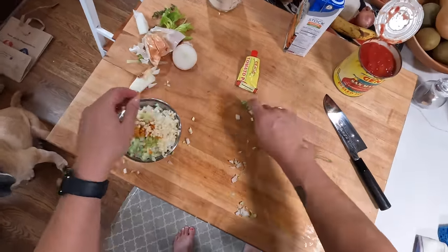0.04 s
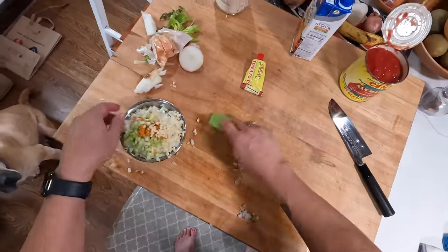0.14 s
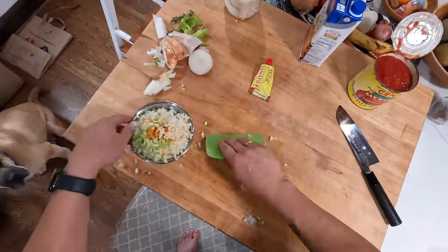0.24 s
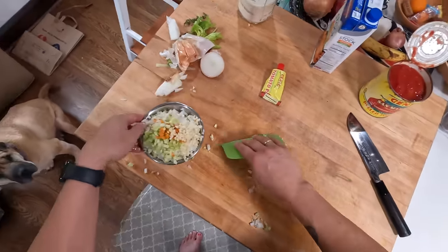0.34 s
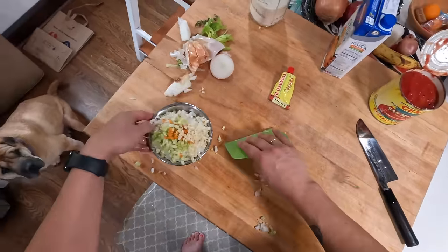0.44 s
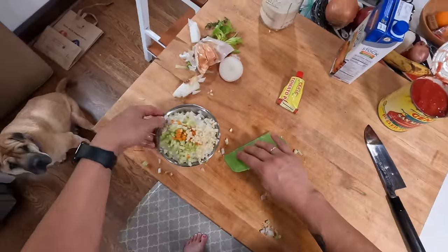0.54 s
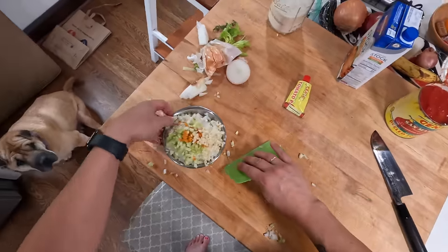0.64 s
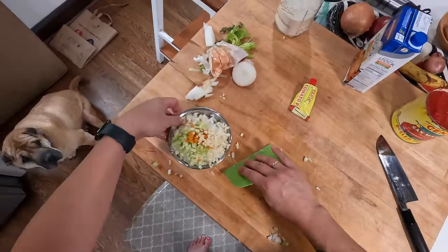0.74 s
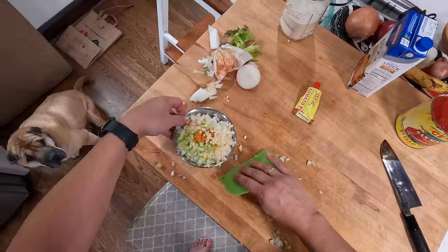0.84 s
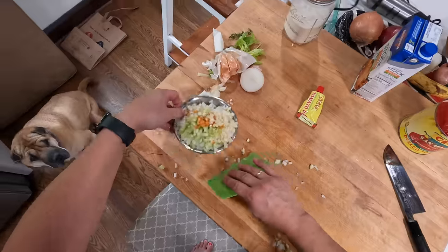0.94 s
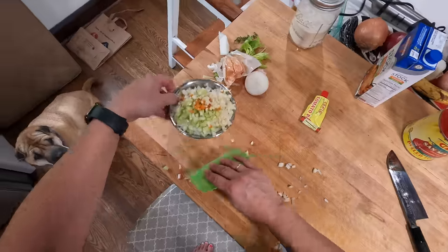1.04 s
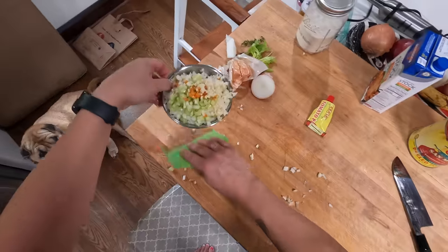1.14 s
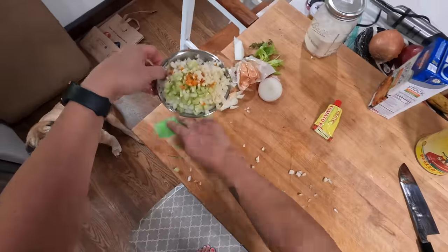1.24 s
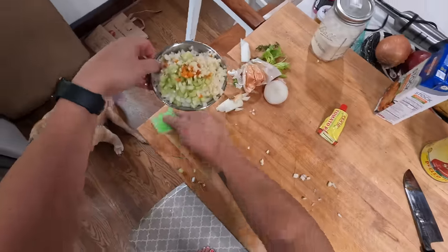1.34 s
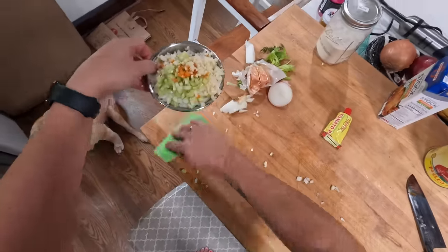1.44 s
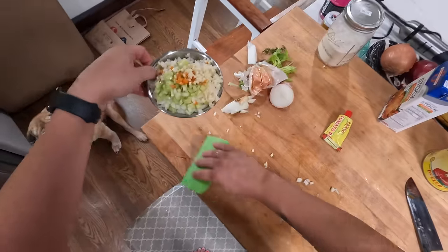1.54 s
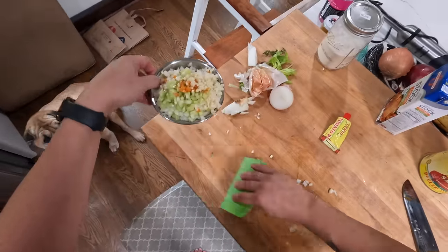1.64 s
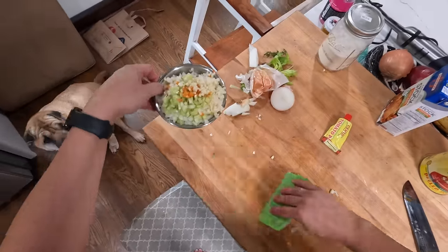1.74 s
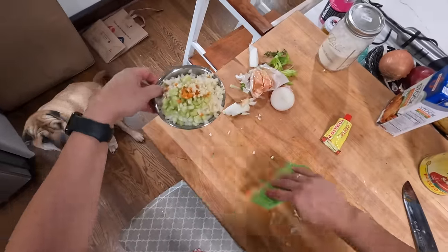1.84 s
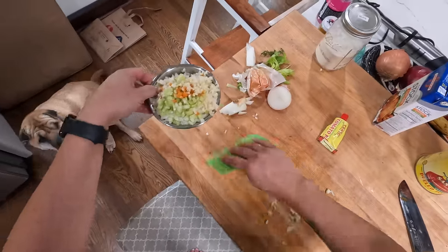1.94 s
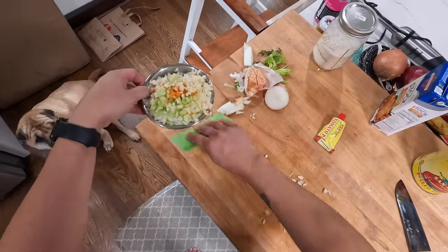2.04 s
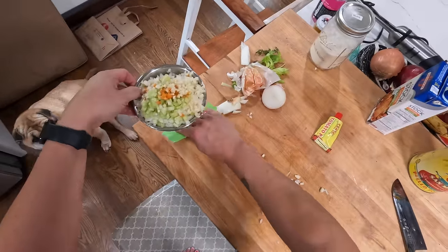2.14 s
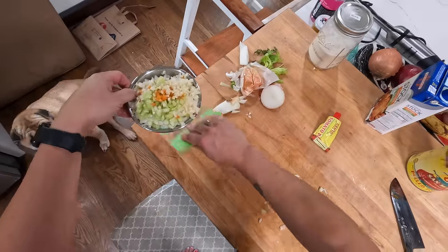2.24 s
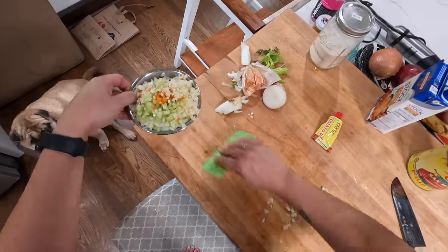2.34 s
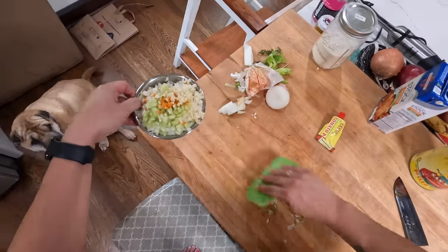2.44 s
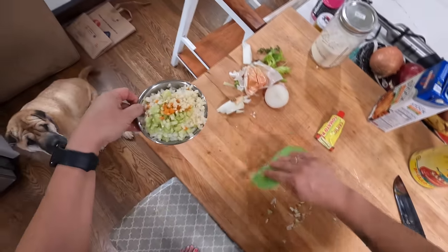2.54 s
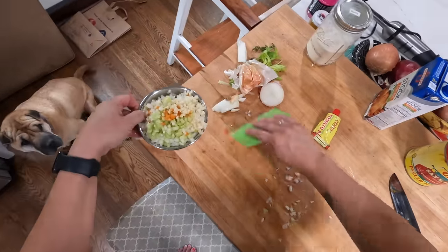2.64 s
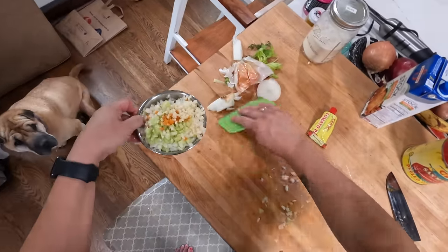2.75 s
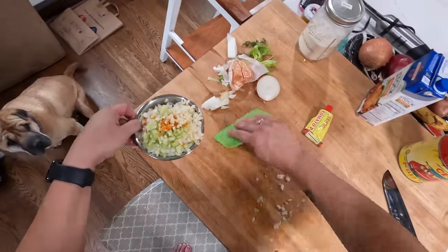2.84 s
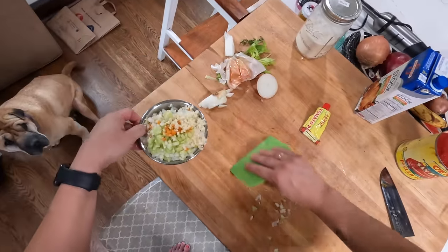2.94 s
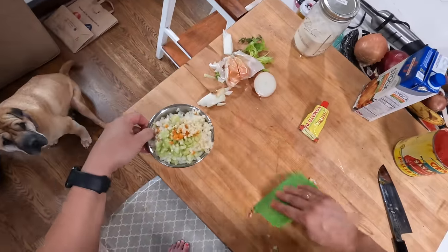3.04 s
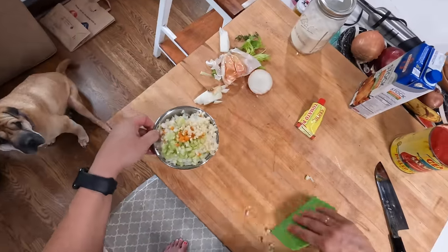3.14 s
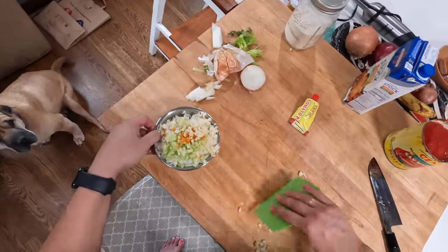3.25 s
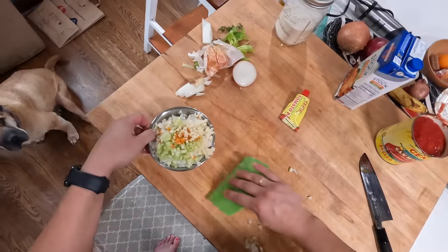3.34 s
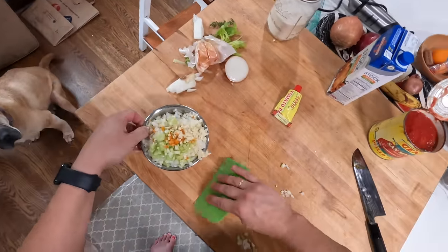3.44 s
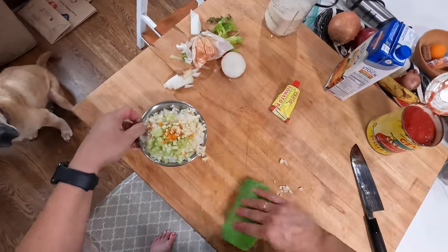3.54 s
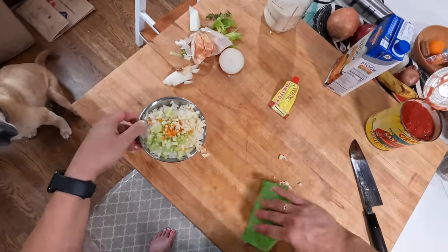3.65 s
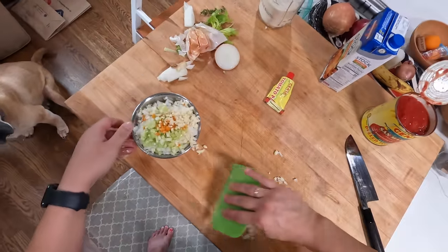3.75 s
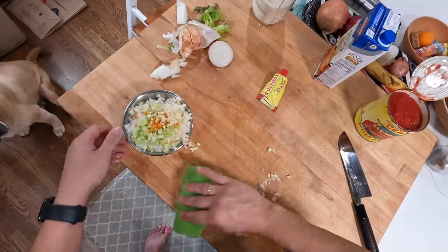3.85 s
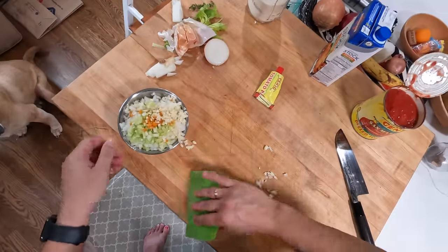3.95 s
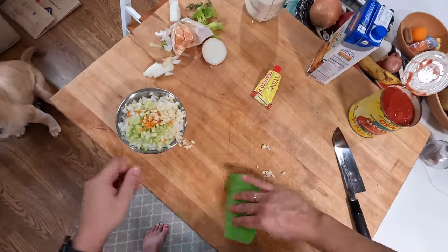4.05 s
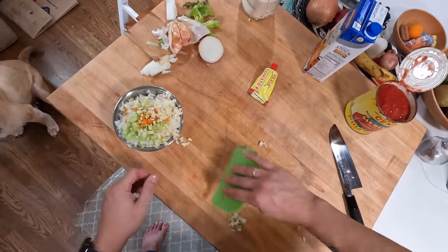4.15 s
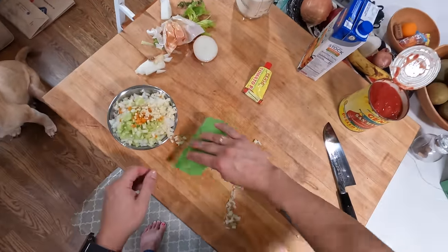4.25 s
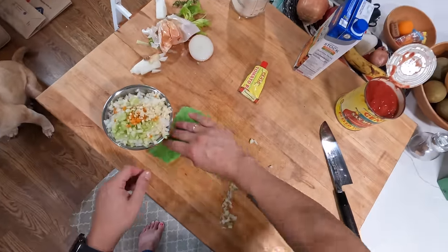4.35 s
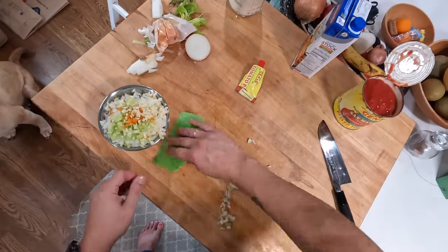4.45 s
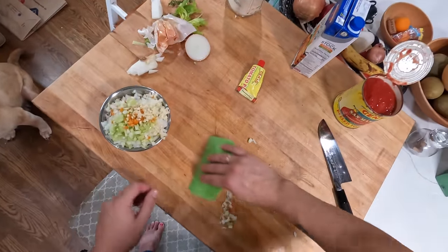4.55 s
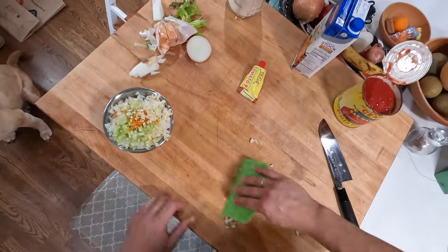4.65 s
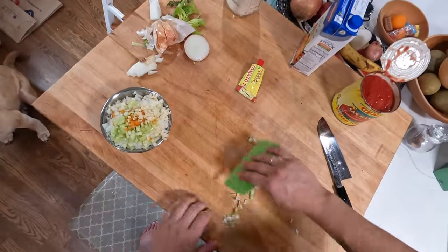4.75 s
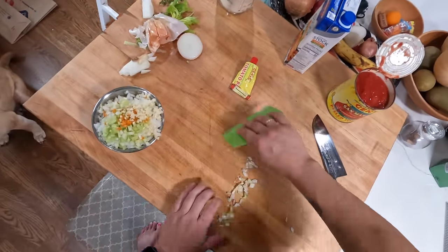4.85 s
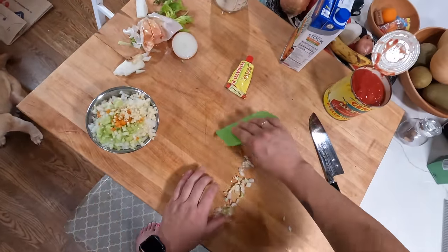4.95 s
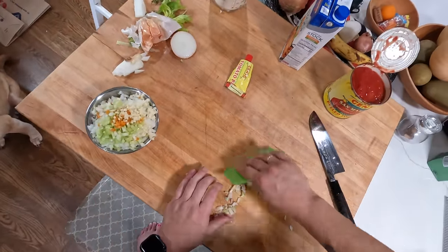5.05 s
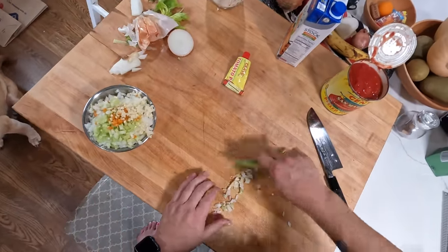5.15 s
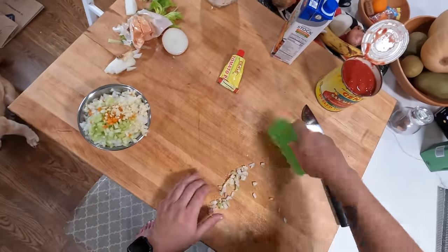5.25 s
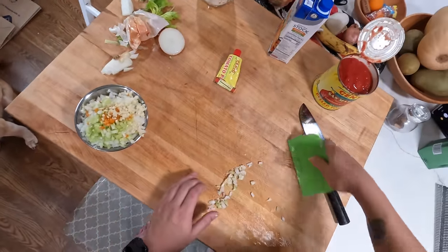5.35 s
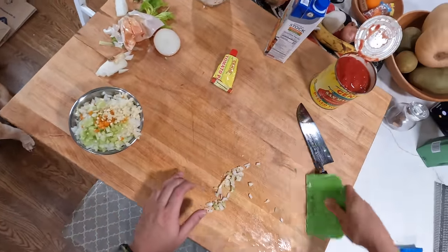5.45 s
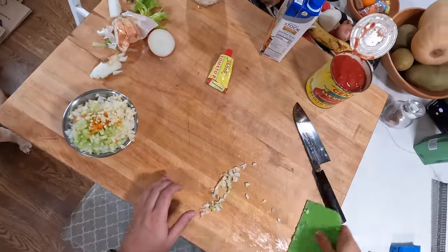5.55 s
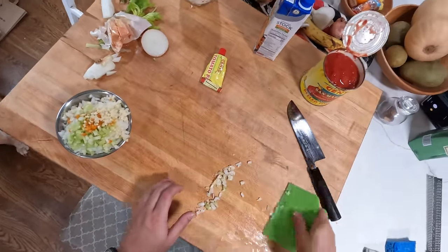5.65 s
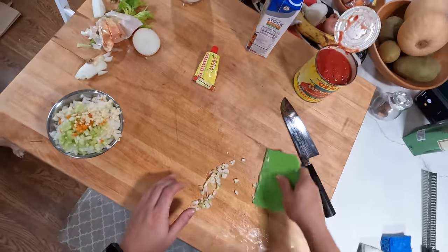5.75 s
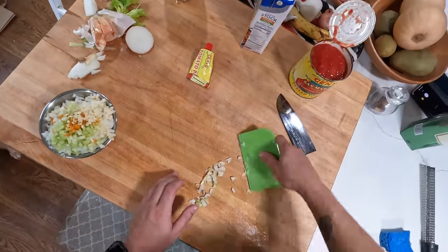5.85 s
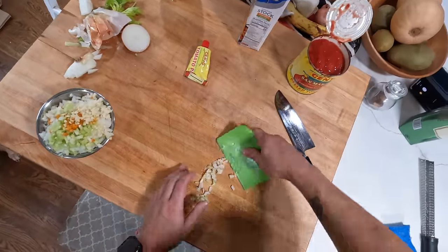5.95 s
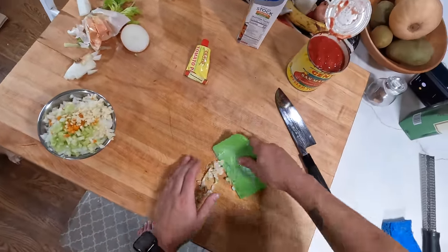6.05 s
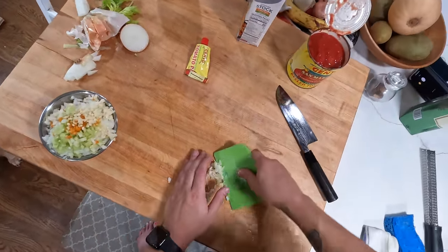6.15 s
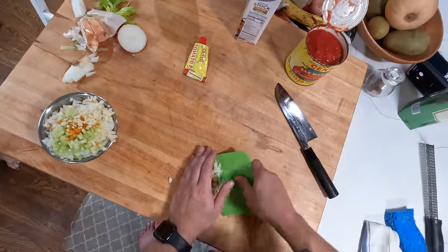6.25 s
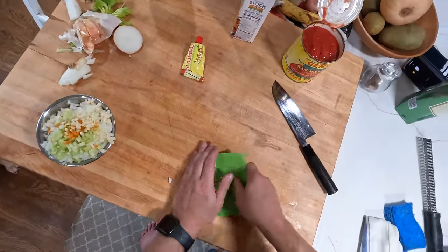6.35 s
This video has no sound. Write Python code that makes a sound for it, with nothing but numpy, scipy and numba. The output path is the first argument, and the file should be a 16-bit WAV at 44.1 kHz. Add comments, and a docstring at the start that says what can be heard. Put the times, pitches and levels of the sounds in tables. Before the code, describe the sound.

Close, dry scraping of a plastic blade on wood, sharp clacks between strokes, a bowl-like knock midway, then softer hollow shoves.

```python
"""Bench scraper on a wooden board

A plastic bench scraper gathers chopped garlic on a wooden board in a small kitchen, heard from just above.
The blade clacks down and is dragged in short strokes: noise from tiny catches on the grain rings the blade
and the board. Crumbs and fingers whisper, and something set down knocks on the wood as decaying modes.
Near the end the blade lies flatter and shoves the heap along more softly, with a hollow, shifting ring.
Behind it lie steady air noise and the dense reflections of the kitchen."""
import sys
import numpy as np
from scipy import signal
from scipy.fft import rfft, irfft
from scipy.io import wavfile
from scipy.ndimage import uniform_filter1d
from numba import njit

SR = 44100
rng = np.random.default_rng(int(sys.argv[2]) if len(sys.argv) > 2 else 0)


def waveform_to_disk(signal):
    """Save audio, clipped to [-1, 1], as 16-bit WAV at the path in sys.argv[1]."""
    frames = np.transpose(np.atleast_2d(signal))
    scaled = np.clip(frames, -1, 1) * 32767
    samples = np.round(scaled).astype(np.int16)
    wavfile.write(sys.argv[1], SR, samples)


N = 282492
T = np.arange(N) / SR


def undb(db):
    """Decibels to gain."""
    return 10 ** (np.asarray(db) / 20)


def unit(x):
    """Scale to rms 1."""
    return x / np.sqrt(np.mean(x ** 2))


def band(x, lo_hz, hi_hz, order=2):
    """Butterworth band-pass."""
    sos = signal.butter(order, [lo_hz, min(hi_hz, SR / 2 - 1)], "band", fs=SR, output="sos")
    return signal.sosfilt(sos, x)


def split(x, edges_hz):
    """Neighbouring zero-phase bands that add up without notches."""
    below = [signal.sosfiltfilt(signal.butter(4, hz, fs=SR, output="sos"), x) for hz in edges_hz]
    return np.diff([0 * x, *below, x], axis=0)


def colour(x, points):
    """Causal filter through (Hz, dB) points, from the cepstrum of the log gain."""
    size = 4096
    point_hz, point_db = np.transpose(points)
    hz = np.maximum(np.fft.rfftfreq(size, 1 / SR), 1)
    # 6 dB per octave fall below the first point
    below_db = 20 * np.log10(np.minimum(hz / point_hz[0], 1))
    gain_db = np.interp(np.log(hz), np.log(point_hz), point_db) + below_db
    cepstrum = irfft(np.log(undb(gain_db)))
    # fold to minimum phase
    cepstrum[1:size // 2] *= 2
    cepstrum[size // 2 + 1:] = 0
    impulse = irfft(np.exp(rfft(cepstrum)))
    return signal.fftconvolve(x, impulse)[:len(x)]


@njit
def resonate(x, hz, width_hz):
    """State-variable band-pass whose centre moves; gain 1 at the centre."""
    y, band_state, low_state = np.empty(len(x)), 0., 0.
    for i in range(len(x)):
        g, damping = np.tan(np.pi * hz[i] / SR), width_hz / hz[i]
        v = (band_state + g * (x[i] - low_state)) / (1 + g * (g + damping))
        band_state = 2 * v - band_state
        low_state += 2 * g * v
        y[i] = damping * v
    return y


def walk(rate_hz):
    """Smooth random wander, rms 1."""
    step = max(int(SR / rate_hz), 2)
    stairs = np.repeat(rng.standard_normal(N // step + 1), step)
    return unit(uniform_filter1d(stairs, step)[:N])


def slips(rate_hz, scatter_db, chatter_db, chatter_hz):
    """Tiny catches of random size, bunched by the chatter of the blade."""
    hits = (rng.random(N) < rate_hz / SR) * rng.choice([-1, 1], N)
    size_db = scatter_db * np.clip(rng.standard_normal(N), -2, 2)
    return hits * undb(size_db + chatter_db * walk(chatter_hz))


def ring(modes, t):
    """Decaying (Hz, dB, t60 s) modes, a little different at each blow; peak 1."""
    y = np.zeros(len(t))
    for hz, db, t60_s in modes:
        tone = np.sin(2 * np.pi * hz * rng.normal(1, .012) * t)
        y += undb(db + rng.normal(0, 1.5)) * tone * undb(-60 * t / t60_s)
    return y / np.abs(y).max()


def repeats(length_s, gap_s, scatter=.2):
    """Times of an uneven run of small contacts, the first at 0."""
    gaps_s = gap_s * np.exp(scatter * rng.standard_normal(32))
    times_s = np.cumsum(np.r_[0, gaps_s])
    return times_s[times_s <= length_s]


def add(track, s, sound):
    """Mix a sound in at time s."""
    i = int(s * SR)
    track[i:i + len(sound)] += sound[:N - i]


# Colour of the air noise. Each row: frequency in Hz, gain in dB.
AIR_COLOUR = [(20, 4), (45, -1.5), (70, -6), (100, -21), (150, -1.5), (213, 2.5), (464, -9), (788, -14),
              (1580, -4), (3700, -6), (5230, -13), (7100, -4), (8400, -11.5), (12000, -16), (15500, -21)]


def quiet(level_db=-55.5, side_db=-9):
    """Steady air noise of the kitchen: coloured noise with a weaker independent side signal."""
    mid, side = (unit(colour(rng.standard_normal(N), AIR_COLOUR)) for _ in range(2))
    return undb(level_db) * (mid + undb(side_db) * np.array([side, -side]))


# Decay of the kitchen. Each row: frequency in Hz, t60 in s, relative level in dB.
ROOM_DECAY = [(150, 0.16, 15.5), (510, 0.32, 0), (1410, 0.42, 1), (3720, 0.41, -6), (6900, 0.45, -6),
              (12500, 0.26, -5.5)]


def kitchen(x, build_s=0.0016, wide_hz=2200):
    """Dense reflections that die band by band; their bass is nearly alike on both sides."""
    t = T[:SR // 2]
    hz, t60_s, db = np.transpose(ROOM_DECAY)
    response = 0
    for lo_hz in 60 * 2. ** np.arange(8):
        log_centre = np.log(lo_hz * np.sqrt(2))
        decay_s, gain_db = (np.interp(log_centre, np.log(hz), column) for column in (t60_s, db))
        mid, side = band(rng.standard_normal((2, len(t))), lo_hz, 2 * lo_hz, order=3)
        width = min(lo_hz / wide_hz, 1) ** 0.7
        stereo = mid + width * np.array([side, -side])
        response = response + stereo * undb(gain_db - 60 * t / decay_s)
    response = response * (1 - np.exp(-(t / build_s) ** 2))
    response = response / np.sqrt(np.sum(response ** 2) / 2)
    return signal.fftconvolve(x[None], response, axes=1)[:, :N]


# Light brushing. Each row: start in seconds, length in s, rustle in dB before trim, hiss in dB re rustle.
BRUSHES = [(0.465, 0.28, -54.5, -4), (0.692, 0.17, -47, -7), (.933, 0.087, -55, -7),
           (1.091, 0.15, -55.5, -15), (1.193, .11, -61, 9), (1.39, 0.23, -47, -7),
           (2.824, 0.09, -43.5, -12), (4.965, 0.13, -45.5, -15), (5.525, 0.16, -40.5, -8)]
# Colour of crumbs on wood. Each row: frequency in Hz, gain in dB.
CRUMB_COLOUR = [(400, -26), (800, -9.5), (1300, -2.5), (2500, -2.5), (4000, -3.5), (5400, -7.5), (7200, -4),
                (8600, -12), (12000, -14), (15000, -36)]


def brushing(trim_db=-1.5, skew=0.46):
    """Crumbs and fingertips whisper over the wood as dense small catches in soft swells."""
    rub = colour(slips(rate_hz=6000, scatter_db=2.0, chatter_db=1.8, chatter_hz=87), CRUMB_COLOUR)
    rustle, hiss = map(unit, split(rub, [5500]))
    out = np.zeros(N)
    for s, length_s, db, hiss_db in BRUSHES:
        # skew under 1: swells quickly, fades slowly
        swell = np.sin(np.pi * np.clip((T - s) / length_s, 0, 1) ** skew)
        out += undb(trim_db + db) * swell * (rustle + undb(hiss_db) * hiss)
    return out


# Dull knocks on the board. Each row: start in seconds, board in dB, rattle ring in dB, rattling in s.
KNOCK_EVENTS = [(2.584, -44, -58, 0.054), (3.332, -16.5, -16.5, 0.11), (3.519, -19.5, -26, 0.018),
                (4.028, -27, -24, 0.021), (4.274, -25.5, -26.5, 0.011), (4.295, -27.5, -28, 0),
                (5.382, -33, -45, 0), (5.528, -59, -48, 0)]
# Modes of the board, also struck by the clacks. Each row: frequency in Hz, relative level in dB, t60 in s.
BOARD_MODES = [(145, -54, .25), (213.6, -19, 0.34), (257, -16, 0.11), (335, -33.5, 0.037), (426, 12, 0.014),
               (567, 13.5, 0.023), (626, 8, 0.051), (766, -24, 0.032)]
# Modes of the ring near 900 Hz. Each row: frequency in Hz, relative level in dB, t60 in s.
RATTLE_MODES = [(800, 7, 0.052), (895, 9, 0.057), (964, 5.5, 0.12), (1020, 6.5, 0.043), (1210, -20, .025),
                (1790, -12, .06), (1920, -15, .06)]


def knocks(contact_s=0.0011, rattle_gap_s=0.0087, rattle_first_db=-6.5, rattle_fade_db_per_s=146):
    """Something set down softly thumps the board, rings near 900 Hz and rattles to rest."""
    out, t = np.zeros(N), T[:SR // 3]
    contact = 1 - np.exp(-t / contact_s)
    for s, board_db, rattle_db, rattling_s in KNOCK_EVENTS:
        rattle = undb(rattle_db) * ring(RATTLE_MODES, t) * contact
        board = undb(board_db) * ring(BOARD_MODES, t) * contact
        add(out, s, board + rattle)
        for late_s in repeats(rattling_s, rattle_gap_s)[1:]:
            add(out, s + late_s, undb(rattle_first_db - rattle_fade_db_per_s * late_s) * rattle)
    return band(out, 101, 6100, order=3)


# Gestures of the flatter blade. Each row: time in seconds, level in dB before trim, bite (treble) in dB,
# weight (low body) in dB before the board trim; bite and weight are relative to the middle band.
SHOVE_GESTURES = [
    [(0.0, -32, -6, -5.5), (0.032, -39, -8, -4), (0.06, -46, 4, -6)],
    [(5.4, -52.5, 3.5, -8), (5.516, -45.5, 0.5, -11), (5.534, -43.5, 4.5, -9), (5.578, -44, 2, -20),
     (5.594, -42.5, 0, -9), (5.642, -35, -1, -5.5), (5.664, -39, 2, -7), (5.73, -33.5, 2.5, -18),
     (5.854, -33.5, -2.5, -20), (5.892, -47.5, 9, -8), (5.93, -39, -7, -18), (5.998, -43.5, -8, -8.5),
     (6.032, -36, -10, -19), (6.148, -46, -2.5, -1.5), (6.23, -39.5, -2.5, -9.5), (6.26, -37.5, -8.5, -6),
     (6.31, -46.5, -6, -3), (6.406, -41.5, -5, -5)],
]
# Colour of the flat blade. Each row: frequency in Hz, gain in dB.
FLAT_COLOUR = [(200, -19), (330, -18.5), (480, -14.5), (750, -8.5), (1000, 3.5), (1300, -0.5), (1700, -1.5),
               (2100, -2), (2600, -4.5), (4000, -8.5), (5200, -14), (7000, -12.5), (9000, -25.5),
               (12000, -27.5), (15000, -46)]
# Gap under the tilted blade. Each row: time in seconds, lower and upper resonance in Hz before flutter.
GAP_RESONANCES = [(5.4, 1210, 2430), (5.55, 1500, 3250), (5.64, 1090, 2800), (5.72, 1340, 3100),
                  (5.8, 1240, 2800), (5.94, 1070, 3300), (6.04, 1460, 3160), (6.27, 1450, 3680),
                  (6.41, 1360, 2830)]


def controls(gestures, fade_s):
    """Curves of a list of gestures; the first becomes a gain that fades out around each gesture."""
    s, *columns = np.vstack(gestures).T
    db, *rest = (np.interp(T, s, column) for column in columns)
    gate = np.zeros(N)
    for rows in gestures:
        first_s, last_s = rows[0][0], rows[-1][0]
        gate += np.interp(T, [first_s - fade_s / 2, first_s, last_s, last_s + fade_s], [0, 1, 1, 0])
    return [undb(db) * gate] + rest


def shoves(trim_db=-1.0, lower_db=9, upper_db=5, crumb_db=-7, board_trim_db=1.5):
    """The flatter blade crackles over wet pieces; the gap beneath it rings hollow and shifts with the tilt."""
    gain, bite_db, weight_db = controls(SHOVE_GESTURES, fade_s=0.015)
    s, *resonances = np.transpose(GAP_RESONANCES)
    lower_hz, upper_hz = (np.interp(T, s, hz) * np.exp(.05 * walk(35)) for hz in resonances)
    sliding = unit(slips(rate_hz=3500, scatter_db=0.5, chatter_db=-1.0, chatter_hz=130))
    crumbs = unit(slips(rate_hz=130, scatter_db=3, chatter_db=2.5, chatter_hz=22))
    rub = colour(sliding + undb(crumb_db) * crumbs, FLAT_COLOUR)
    lower = resonate(rub, lower_hz, 290.)
    upper = resonate(rub, upper_hz, 480.)
    rung = rub + undb(lower_db) * lower + undb(upper_db) * upper
    board, hollow, grit = split(rung, [830, 2200])
    board = unit(band(board, 175, 1100, order=4))
    body = undb(weight_db + board_trim_db) * board
    return undb(trim_db) * gain * (unit(hollow) + undb(bite_db) * unit(grit) + body)


# Judders over a ridge or hard piece. Each row: start in seconds, length in s, mean level in dB, pitch in Hz.
JUDDER_RUNS = [(1.523, .045, -13, 2200), (5.635, .025, -31, 985), (5.642, .085, -22, 3010),
               (5.704, .07, -19, 1360)]


def judders(scatter_db=2, gap_s=0.021, t60_s=0.019, bend_s=0.00036):
    """The edge sticks and lets go, in a short run if there is time; each release rings the blade."""
    out, t = np.zeros(N), T[:SR // 10]
    for s, length_s, db, hz in JUDDER_RUNS:
        sizes_db = db + scatter_db * rng.standard_normal(33)
        tone = np.sin(2 * np.pi * hz * t)
        release = tone * undb(-60 * t / t60_s) * (1 - np.exp(-t / bend_s))
        for late_s, size_db in zip(repeats(length_s, gap_s), sizes_db):
            add(out, s + late_s, undb(size_db) * release)
    return out


# Landings and ticks of the blade. Each row: start in seconds, level in dB, blade pitch in Hz,
# then board, crisp tick and slow flex in dB against the blade.
CLACK_EVENTS = [(0.085, -17, 3460, -19, -9, -28), (0.732, -35, 2600, -3.5, -8, -12),
                (0.935, -42.5, 3100, -18, 0, -23), (1.394, -34.5, 1390, -6, -13, -17),
                (1.444, -16.5, 2370, -12, -6, -15.5), (2.2597, -23.5, 2300, -32, 0.5, -5),
                (2.264, -12.5, 2080, -14.5, -6, -18.5), (2.839, -23.5, 2180, -30, -1, -14),
                (2.8625, -13, 1920, -19, -9, -16), (3.494, -24, 2150, -34, -3, 3),
                (3.499, -20, 2120, -36, -5, -6), (4.009, -17, 2080, -15, -9, -4.5),
                (4.4783, -9, 1870, -17.5, -3, -22), (4.988, -35.5, 2130, -6, -14, -16),
                (5.058, -15.5, 1920, -44, -4.5, -9), (5.383, -26, 2430, -7.5, -11, -11),
                (5.5299, -22.5, 3060, -10.5, -9, -12)]
# Colour of the upright edge, also used by the strokes. Each row: frequency in Hz, gain in dB.
EDGE_COLOUR = [(240, -79), (400, -36.5), (772, -17), (971, -13), (1150, -2), (1610, -4.5), (1990, -4.5),
               (2510, -2.5), (4280, -3), (7200, -9.5), (8520, -19), (10900, -24.5), (12100, -24),
               (14300, -42), (15500, -24)]


def clacks(tick_s=0.0016, blade_t60_s=0.0038, flex_hz=1060, flex_t60_s=0.0099, bend_s=0.00039):
    """Each landing: a crisp tick, a few cycles of the hand-damped blade, and the board beneath."""
    plastic, wood, t = np.zeros(N), np.zeros(N), T[:SR // 3]
    for s, db, hz, board_db, tick_db, flex_db in CLACK_EVENTS:
        tick = colour(rng.standard_normal(len(t)) * np.exp(-t / tick_s), EDGE_COLOUR)
        tick = tick / np.abs(tick).max()
        # the blade takes about a cycle to bend, which rounds the attack
        blade = ring([(hz, 0, blade_t60_s), (flex_hz, flex_db, flex_t60_s)], t) * (1 - np.exp(-t / bend_s))
        blade = blade / np.abs(blade).max()
        add(plastic, s, undb(db) * (blade + undb(tick_db) * tick))
        add(wood, s, undb(db + board_db) * ring(BOARD_MODES, t))
    # small bodies radiate no deep bass
    return band(plastic, 387, 19000) + band(wood, 174, 4400, order=3)


# Strokes of the edge. Each row: start in seconds, speeding up in s, full level in s, braking in s,
# level in dB before trim, bite (treble) in dB and weight (low body) in dB at full speed,
# blade resonance at full speed in Hz, grunt as it stops in dB re the stroke level.
EDGE_STROKES = [(0.065, 0.021, 0.17, 0.11, -25.5, -9, -18, 2500, -36),
                (1.454, 0.059, 0.23, 0.12, -26.5, -2, -27.5, 2650, -47),
                (1.664, 0.049, .13, 0.049, -21, -6.5, -30, 2410, -17.5),
                (2.274, 0.079, 0.11, 0.12, -30, -3.5, -20, 2350, -40),
                (2.384, .085, 0.089, 0.038, -23, -2.5, -31.5, 2350, -23),
                (2.905, 0.1, 0.093, 0.14, -24.5, -5.5, -31, 2500, -45),
                (3.075, 0.076, 0.041, 0.081, -23, -10, -28, 3040, -17.5),
                (3.537, .075, .085, 0.048, -20.5, -9.5, -26, 2180, -15),
                (4.025, 0.092, 0.023, 0.047, -19, -9, -23, 1990, -14),
                (4.492, 0.12, 0.12, 0.064, -20.5, -7, -26, 2470, -22),
                (5.055, 0.045, 0.051, 0.049, -25, -6.5, -22.5, 2120, -26)]


def arm(slow_bite_db=-5.5, slow_weight_db=10.5, slow_sag=0.31, speed_curve=1.55, start_share=0.088,
        attack_curve=1.19, release_curve=0.95, grunt_lead_s=0.025, grunt_s=0.012):
    """Gain, bite, weight, resonance and grunt of all strokes; fastest in mid-stroke, duller and lower when slow."""
    power, grunt, mix = np.full(N, 1e-12), np.zeros(N), np.zeros((3, N))
    for s, rise_s, hold_s, fall_s, db, bite_db, weight_db, hz, grunt_db in EDGE_STROKES:
        length_s = rise_s + hold_s + fall_s
        t = T[:int(length_s * SR)]
        # start_share: share of the level at first touch
        attack = start_share + (1 - start_share) * np.minimum(t / rise_s, 1) ** attack_curve
        release = np.minimum((length_s - t) / fall_s, 1) ** release_curve
        gain = undb(db) * attack * release
        # 0 at full speed, 1 at rest
        slow = 1 - np.sin(np.pi * t / length_s) ** speed_curve
        add(power, s, gain ** 2)
        add(grunt, s, undb(db + grunt_db) * np.exp(-((t - length_s + grunt_lead_s) / grunt_s) ** 2))
        tone = [bite_db + slow_bite_db * slow, weight_db + slow_weight_db * slow, hz * (1 - slow_sag * slow)]
        # where two pushes overlap, the stronger sets the tone
        for track, value in zip(mix, tone):
            add(track, s, gain ** 2 * value)
    bite_db, weight_db, hz = mix / power
    return np.sqrt(power), bite_db, weight_db, np.maximum(hz, 1000), grunt


# Narrow resonances of the pressed blade. Each row: frequency in Hz, width in Hz, gain in dB.
BLADE_RESONANCES = [(975, 61, 7.5), (1260, 39, -34), (2020, 87, -8)]
# Reflections from things on the counter. Each row: delay in ms, drift during a stroke in ms per s, gain in dB.
COUNTER_REFLECTIONS = [(1.9, 0.97, -23.5), (4.3, 1.25, -28.5), (8.9, 1.68, -22)]


def strokes(trim_db=-1.5, flex_db=1, flex_width_hz=800, rest_hz=2350, lean=0.41, uneven_db=0.53):
    """The edge rasps over the grain; speed brings treble, leaning on the blade brings out the board."""
    gain, bite_db, weight_db, flex_hz, grunt = arm()
    catches = colour(slips(rate_hz=8000, scatter_db=2.5, chatter_db=0.5, chatter_hz=150), EDGE_COLOUR)
    rasp = catches.copy()
    for hz, width_hz, db in BLADE_RESONANCES:
        rasp += undb(db) * band(catches, hz - width_hz / 2, hz + width_hz / 2, order=1)
    board, low, high, grit = split(rasp, [800, 2500, 4600])
    # held upright the blade is stiffer: its main resonance rises and its upper range takes over
    stiff = (flex_hz / rest_hz) ** lean
    blade = low / stiff + high * stiff
    flutter = np.exp(.05 * walk(45))
    blade = unit(blade + undb(flex_db) * resonate(blade, flex_hz * flutter, float(flex_width_hz)))
    grit = unit(grit) * undb(bite_db + 1.54 * walk(40))
    board = unit(band(board, 170, 1200)) * undb(-4.0)
    dragged = gain * (blade + grit + undb(weight_db) * board)
    y = undb(trim_db + uneven_db * walk(35)) * (dragged + grunt * board)
    # reflections lengthen as the blade travels, so ridges slide down through the rasp
    starts_s = np.array([row[0] for row in EDGE_STROKES])
    travel_s = T - starts_s[np.maximum(np.searchsorted(starts_s, T) - 1, 0)]
    out = y.copy()
    for delay_ms, drift, db in COUNTER_REFLECTIONS:
        out += undb(db) * np.interp(T - (delay_ms + drift * travel_s) / 1000, T, y)
    return out


def scene(scrape_room_db=-8, hit_room_db=-6, side_db=-11):
    """Everything happens on the board straight ahead, inside the kitchen."""
    scraping = strokes() + shoves() + brushing()
    hits = clacks() + judders() + knocks()
    direct = scraping + hits
    # the two sides differ in phase in the presence range
    side = undb(side_db) * signal.hilbert(band(direct, 2420, 3460, order=2)).imag
    room = kitchen(undb(scrape_room_db) * scraping + undb(hit_room_db) * hits)
    return direct + np.array([side, -side]) + room + quiet()


def record(dry, soften_hz=13500, top_hz=15600):
    """Treble softens from 13.5 kHz and ends at 15.6 kHz."""
    soft = signal.sosfilt(signal.butter(8, soften_hz, fs=SR, output="sos"), dry)
    return signal.sosfilt(signal.ellip(12, .2, 90, top_hz, fs=SR, output="sos"), soft)


dry = scene()
out = record(dry)
waveform_to_disk(out)
```